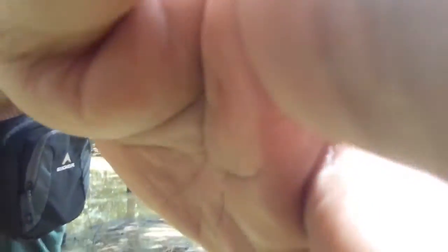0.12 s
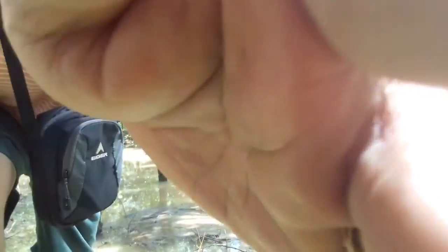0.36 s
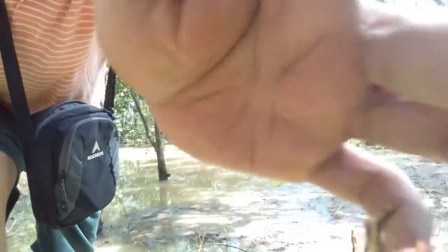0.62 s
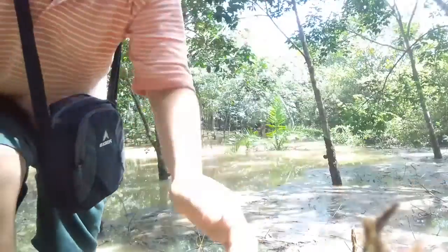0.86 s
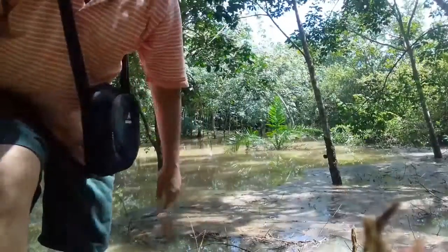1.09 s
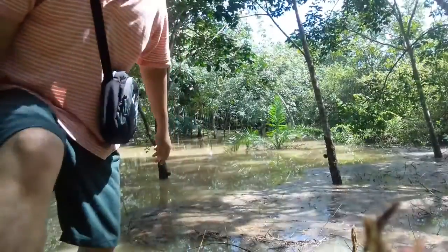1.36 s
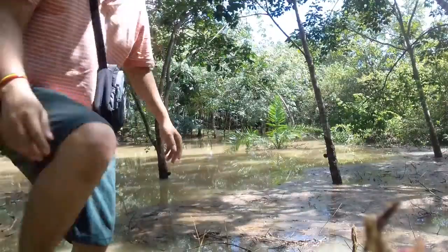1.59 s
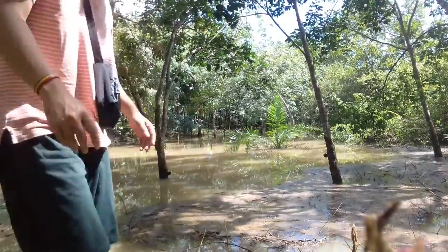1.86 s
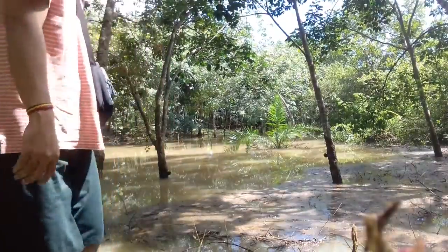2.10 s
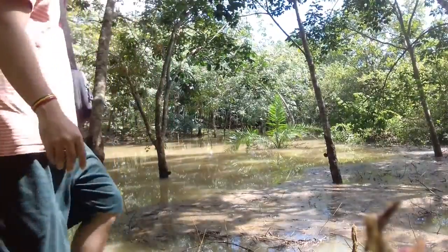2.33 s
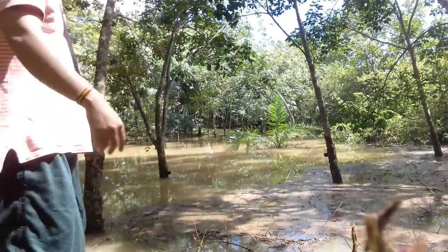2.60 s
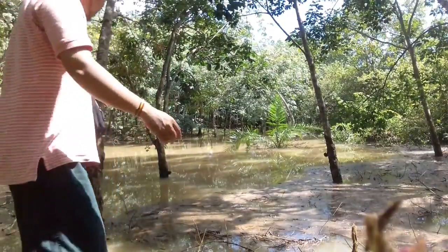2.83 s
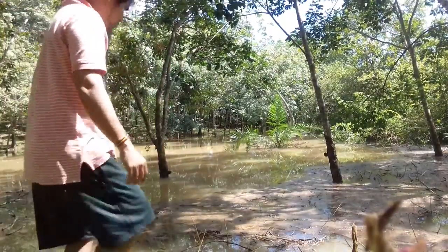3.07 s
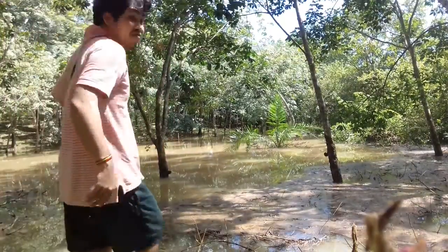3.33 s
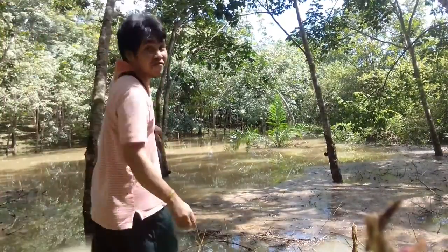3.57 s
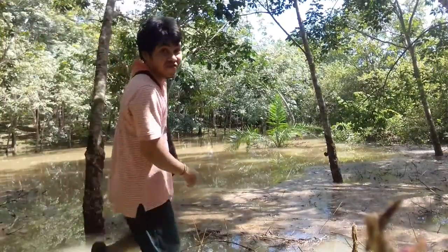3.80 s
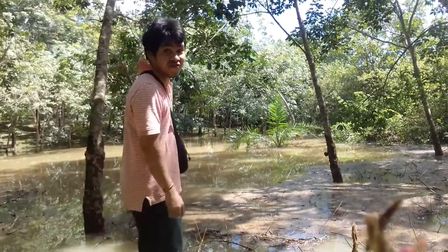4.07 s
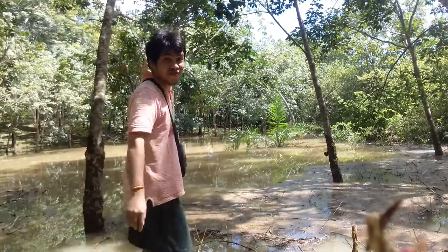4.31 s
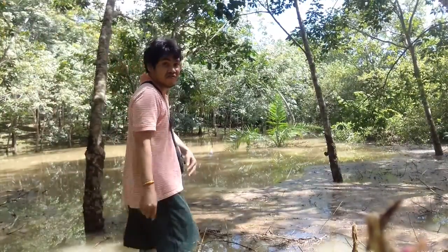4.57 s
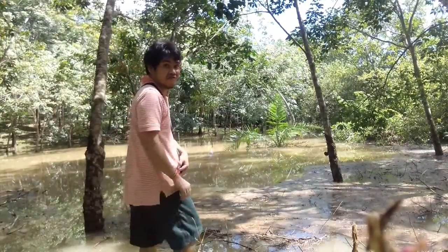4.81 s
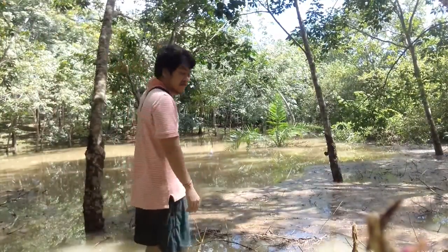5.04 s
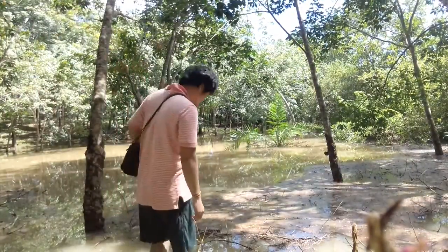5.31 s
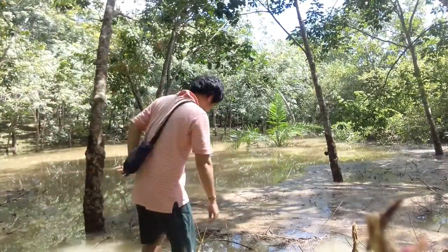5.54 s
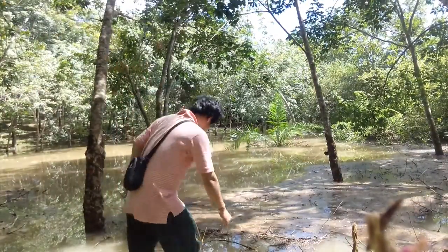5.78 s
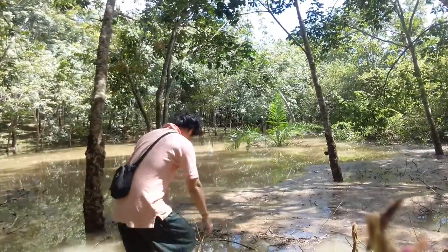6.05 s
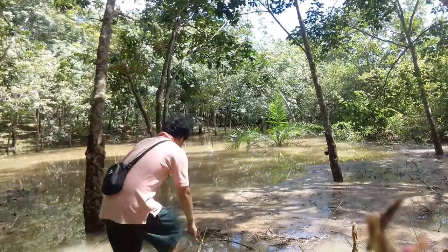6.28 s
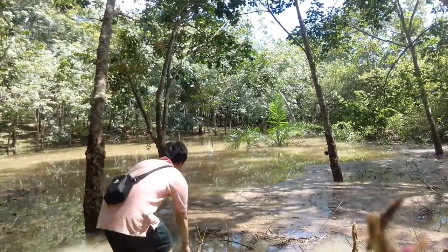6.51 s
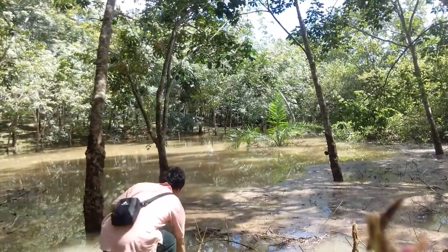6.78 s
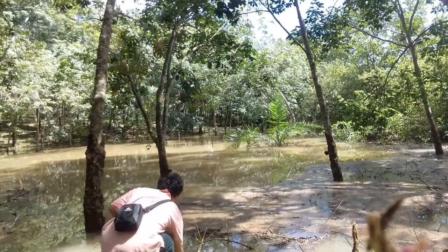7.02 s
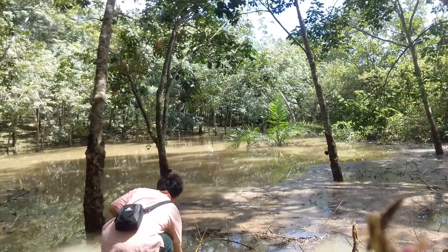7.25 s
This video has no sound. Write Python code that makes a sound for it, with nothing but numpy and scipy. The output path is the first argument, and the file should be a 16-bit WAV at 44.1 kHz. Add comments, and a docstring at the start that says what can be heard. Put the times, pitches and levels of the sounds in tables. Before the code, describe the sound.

Someone wades through wet litter with cracks and small mud plops while a near bird repeats chip-and-rising-whistle calls over shimmering insects.

```python
"""Wading through a flooded forest

A tropical forest under water: distant rumble, airy noise and the wash of wading lie below a chorus band
of dense clicks, far insects with some wading rustle and its echo. One near insect buzzes in bursts of
ringing clicks; birds whistle as gliding sines, and one voice croaks. Loud knocks open the scene, then
feet wade: wet litter crackles as filtered noise, twigs snap as struck modes and mud plops as sinking
tones. Scattered echoes surround the birds and the feet."""
import sys
import numpy as np
from scipy import signal
from scipy.fft import rfft, irfft
from scipy.io import wavfile
from scipy.ndimage import uniform_filter1d

SR = 44100
rng = np.random.default_rng(int(sys.argv[2]) if len(sys.argv) > 2 else 0)


def field_ratio(decibels):
    """Amplitude ratio for a level in dB (20 dB per decade); scalars and array-likes work."""
    return 10 ** (np.asarray(decibels, dtype=float) / 20)


def persist_wave(psi):
    """Save psi, clipped to +-1, as 16-bit WAV."""
    counts = np.round(np.clip(psi, -1, 1) * 32767).astype(np.int16)
    wavfile.write(sys.argv[1], SR, np.atleast_2d(counts).T)


N = 325899

# Slow swell of the background, before faster chance wavering:
# (time [s], rumble level [dB], level of the low chorus band, with wading rustle and its echo [dB],
# level of the high chorus band [dB], level of the airy noise and wading wash [dB])
SWELL = [(0.0, -53.5, -52, -58.5, -63.5), (0.3, -52.5, -56.5, -54, -64), (0.93, -58, -61.5, -61, -65),
         (1.48, -53, -57, -59.5, -65), (2.04, -54.5, -60.5, -59.5, -65), (2.24, -55.5, -58, -59.5, -60.5),
         (2.6, -53, -60.5, -58, -62), (3.0, -54.5, -62, -58, -62), (3.43, -56, -60.5, -59.5, -60.5),
         (3.7, -55, -56, -59, -58.5), (4.09, -56, -58.5, -60, -62.5), (4.82, -58, -63, -60, -65),
         (5.37, -57, -55, -60, -62.5), (5.7, -55, -59, -59, -58.5), (6.0, -57, -57.5, -59.5, -64),
         (6.98, -55.5, -58.5, -59.5, -63), (7.39, -56, -59.5, -59.5, -66.5)]


def evened(x):
    """Normalises the mean power: scales to rms 1."""
    return x / np.sqrt(np.mean(x ** 2) + 1e-20)


def read(points, hz):
    """Interpolates a spectrum on a logarithmic frequency axis."""
    f, value = np.transpose(points)
    return np.interp(np.log(hz + 1), np.log(f + 1), value)


def along(rows, column):
    """Interpolates one column of a time curve linearly at every sample."""
    rows = np.array(rows)
    return np.interp(np.arange(N) / SR, rows[:, 0], rows[:, column])


def add(mix, s, sound):
    """Superposition: mixes a sound in from time s."""
    part = mix[round(s * SR):][:len(sound)]
    part += sound[:len(part)]


def colour(x, points):
    """Linear filtering: weights the spectrum of x by a curve in dB."""
    gain = field_ratio(read(points, np.fft.rfftfreq(len(x), 1 / SR)))
    return irfft(rfft(x) * gain, len(x))


def split(x, hz):
    """Complementary filtering: the parts below and above hz add up to x."""
    low = signal.sosfiltfilt(signal.butter(4, hz, fs=SR, output="sos"), x)
    return low, x - low


def ring(x, hz, width):
    """Damped resonance: every click rings one mode, whose envelope starts at the click's height."""
    r, w = np.exp(-np.pi * width / SR), 2 * np.pi * hz / SR
    return signal.lfilter([0, np.sin(w)], [1, -2 * r * np.cos(w), r * r], x)


def steep(x, hz, width):
    """Two equal resonances in series give a softer start and darker flanks than one."""
    twice = ring(ring(x, hz, width), hz, width)
    return twice * 2 * (1 - np.exp(-np.pi * width / SR))


def clicks(per_s, spread_db):
    """Random impulse process: clicks of either sign at chance times, a few of them large."""
    draw = rng.random((N, 3))
    size = field_ratio(-spread_db * np.log(np.maximum(draw[:, 0], .004)))
    return size * (draw[:, 1] < per_s / SR) * np.sign(draw[:, 2] - .5)


def wobble(per_s):
    """Slow random modulation of rms 1: straight lines between chance knots, per_s of them a second."""
    knots = rng.standard_normal(int(N / SR * 60) + 2)
    return evened(np.interp(np.arange(N) / SR * per_s, np.arange(len(knots)), knots))


def tone(hz, db, edge, overtone_db):
    """Phase integration: a gliding sine with a weak octave and soft ends; db is the sine's rms level."""
    turn = 2 * np.pi * np.cumsum(hz) / SR
    wave = np.sin(turn) + field_ratio(overtone_db) * np.sin(2 * turn)
    return np.sqrt(2) * field_ratio(db) * wave * signal.windows.tukey(len(hz), np.clip(edge, 0, 1))


def note(rows):
    """Interpolates a note's contour: its start time and each column at every sample."""
    s, *columns = np.transpose(rows)
    t = np.arange(s[0], s[-1], 1 / SR)
    return s[0], [np.interp(t, s, c) for c in columns]


def forest(x):
    """Multiple scattering: trunks return sparse taps, each band decaying at its own speed."""
    # Decay of the echoes: (frequency [Hz], time to fall by 60 dB [s])
    decay = [(300, 0.093), (2000, 0.68), (4500, 0.83), (12000, 0.39)]
    taps = np.zeros(SR)
    at = np.arange(500, SR - 20, 20)
    taps[at + rng.integers(0, 20, len(at))] = rng.choice([-1., 1.], len(at))
    hz, t, z = signal.stft(taps, SR, nperseg=256)
    t60 = np.maximum(read(decay, hz), .02)[:, None]
    tail = signal.istft(z * field_ratio(-60 * t / t60), SR, nperseg=256)[1]
    return signal.fftconvolve(x, tail / np.linalg.norm(tail))[:N]


def distant_rumble():
    """Amplitude-modulated low noise: a distant rumble that heaves."""
    # Relative spectrum of the rumble: (frequency [Hz], density [dB per Hz])
    rumble_spectrum = [(15, -58), (25, -36), (32, -37), (54, -23), (67, -13), (78, -9.5), (87, -3.5),
                       (102, 4.5), (119, -2.5), (150, 0.5), (197, -6.5), (233, -5.5), (271, -5.5),
                       (302, -13), (420, -20), (550, -26), (920, -120)]
    level_db = along(SWELL, 1) + 0.86 * wobble(9)
    return field_ratio(level_db) * evened(colour(rng.standard_normal(N), rumble_spectrum))


def airy_noise_and_wash():
    """Amplitude-modulated broad noise: airy forest noise and the wash of wading."""
    # Relative spectrum of the airy noise and wash: (frequency [Hz], density [dB per Hz])
    airy_spectrum = [(180, -55), (300, -5), (526, -2.5), (654, -5.5), (726, -4.5), (1720, -5.5),
                     (2890, -12), (3600, -19), (4680, -45), (7920, -120)]
    level_db = along(SWELL, 4) + 1.46 * wobble(6.6)
    return field_ratio(level_db) * evened(colour(rng.standard_normal(N), airy_spectrum))


def hums():
    """Frequency and amplitude modulation: faint low tones waver in pitch and level."""
    # Hums before wavering: (frequency [Hz], level [dB], start [s], end [s])
    hum_rows = [(142.8, -67, 0.0046, 9.8), (650, -74.5, 0.08, .52)]
    out = np.zeros(N)
    for hz, db, start, end in hum_rows:
        count = round((end - start) * SR)
        pitch_waver, level_waver = wobble(7)[:count], wobble(28)[:count]
        wavering_hz = hz * (1 + .012 * pitch_waver)
        add(out, start, tone(wavering_hz, db + 3.4 * level_waver, edge=.1, overtone_db=-40))
    return out


def chorus():
    """Dense superposition: clicks merge in two bands, far insects and, in the low one, wading rustle."""
    # Relative spectrum of the chorus: (frequency [Hz], density [dB per Hz])
    chorus_spectrum = [(1940, -26.5), (3300, -18.5), (3810, -10), (4220, -8.5), (4320, -1.5), (4490, -4.5),
                       (4600, 4), (5110, -6), (5680, -7), (6100, -18), (6700, -4), (7130, 0), (7500, -3),
                       (8020, -28.5), (8400, -25.5), (10900, -37), (18500, -120)]
    low, high = split(colour(clicks(9000, spread_db=1.5), chorus_spectrum), 6200)
    low_db = along(SWELL, 2) + 1.8 * wobble(16)  # also swells with the rustle and its echo
    high_db = along(SWELL, 3) + 0.26 * wobble(11)
    return evened(low) * field_ratio(low_db) + evened(high) * field_ratio(high_db)


def singer():
    """Quadrature modulation: noise shifted up to an insect's pitch swells slowly and drops away."""
    # Swells of the narrow band: (time of the peak [s], time of the rise [s], frequency [Hz], peak level [dB])
    swells = [(0.402, 0.32, 4600, -55), (1.498, 0.34, 4400, -55.5), (2.898, 0.17, 4520, -50),
              (4.24, 0.094, 4490, -57)]
    rise_db, fall_db_per_s, rest_db = 6, 200, -71.5  # rise_db is gained in each time of the rise
    a, b = signal.sosfilt(signal.butter(2, 130, fs=SR, output="sos"), rng.standard_normal((2, N)))
    t = np.arange(N) / SR
    s, rise, hz, db = np.transpose(swells)[:, :, None]
    level_db = db - np.maximum(rise_db * (s - t) / rise, fall_db_per_s * (t - s))
    turn = 2 * np.pi * np.cumsum(np.interp(t, s[:, 0], hz[:, 0])) / SR
    fuzzy_whistle = evened(a * np.cos(turn) + b * np.sin(turn))
    return field_ratio(np.maximum(level_db.max(0), rest_db)) * fuzzy_whistle


def far_birds():
    """Random modulation in propagation: a long whistle and slurs flutter on their way through the trees."""
    # Long whistle before its flutter: (time [s], frequency [Hz], level [dB])
    far_whistle = [(5.77, 1915, -63.5), (6.05, 1893, -58.5), (6.1, 1990, -65.5), (6.25, 2185, -68),
                   (6.45, 2090, -67), (6.62, 2020, -70), (6.7, 2032, -61), (6.95, 2115, -64.5),
                   (7.17, 2221, -59.5), (7.39, 2200, -66)]
    # Falling slurs of a small bird, before the flutter:
    # (time [s], length [s], first frequency [Hz], last frequency [Hz], level [dB])
    slurs = [(5.70, .055, 5200, 3900, -61), (6.125, .065, 5700, 4000, -59), (7.055, .075, 5800, 3700, -57)]
    out = np.zeros(N)
    s, (hz, db) = note(far_whistle)
    flutter_db = 4 * wobble(58)
    trembling_hz = hz * (1 + 0.0118 * wobble(40)[:len(hz)])
    add(out, s, tone(trembling_hz, db + flutter_db[:len(hz)], edge=0.017, overtone_db=-41))
    for s, length, first_hz, last_hz, db in slurs:
        count = round(length * SR)
        falling_hz = np.geomspace(first_hz, last_hz, count)
        add(out, s, tone(falling_hz, db + flutter_db[:count], edge=.5, overtone_db=-40))
    return out


def croak():
    """Source and filter: regular pulses excite two resonances and die away."""
    # The croak: (time [s], length [s], pulse rate [Hz], level before the fade [dB])
    s, length, hz, db = (3.762, .11, 248, -49)
    # Resonances of the body: (frequency [Hz], width [Hz], relative gain [dB])
    body_modes = [(560, 180, 6), (1320, 170, 1.5)]
    fade_db = 22
    out = np.zeros(N)
    u = np.linspace(0, 1, round(length * SR))
    pulses = np.diff(np.floor(u * length * hz), prepend=0)
    body = sum(field_ratio(gain_db) * ring(pulses, f, width) for f, width, gain_db in body_modes)
    add(out, s, field_ratio(db - fade_db * u ** 2) * evened(body) * signal.windows.tukey(len(u), .3))
    return out


def near_insect():
    """Impulsive excitation of resonances: short runs of regular clicks ring the tymbal's modes."""
    # Bursts: (time of the first click [s], level before the modes' gains [dB])
    bursts = [(0.033, -61), (0.165, -62), (0.267, -66), (0.355, -66), (0.3802, -58.5), (0.4853, -57),
              (0.548, -62), (0.652, -64), (0.7043, -63), (0.7786, -64), (0.8843, -59), (0.946, -62.5),
              (1.0053, -61), (1.2054, -63), (1.4245, -61), (1.65, -59), (1.693, -60), (1.724, -61.5),
              (1.7846, -60), (1.822, -60.5), (1.8914, -58), (1.95, -58.5), (2.025, -60), (2.09, -58)]
    # Modes of the tymbal: (frequency [Hz], width [Hz], gain [dB])
    tymbal = [(4550, 810, 21), (5750, 420, 12), (9860, 1300, 3.5)]
    burst_clicks, clicks_per_s = 5, 216.6
    drive, at = np.zeros(N), np.arange(burst_clicks) / clicks_per_s
    for (s, db), wander in zip(bursts, rng.standard_normal((len(bursts), burst_clicks))):
        drive[np.round((s + at) * SR).astype(int)] += field_ratio(db + 1.1 * wander)
    # two ribs buckle in turn, 9 samples apart
    drive = np.convolve(drive, [.6, 0, 0, 0, 0, 0, 0, 0, 0, .8], "same")
    return sum(field_ratio(db) * steep(drive, hz, width) for hz, width, db in tymbal)


def near_bird():
    """Frequency glides: a falling chip swoops down, then a whistle climbs steadily, swells and stops."""
    # Rising whistles: (time of the peak [s], frequency at the peak [Hz], peak level [dB],
    # time of the rise [s], climb [Hz per s])
    whistles = [(2.480, 1835, -41.5, 0.056, 8050), (2.855, 1750, -38, 0.075, 3770),
                (3.137, 1870, -37.5, 0.063, 9500), (3.482, 1728, -40, 0.077, 3020),
                (3.763, 1830, -36.5, 0.053, 9920), (6.386, 1770, -40.5, 0.064, 6880),
                (6.749, 1803, -38.5, 0.099, 4190), (7.086, 1794, -37.5, 0.082, 4600),
                (7.43, 1743, -48, 0.12, 4400)]
    # Falling chips: (time near the peak [s], peak level [dB], middle frequency [Hz],
    # swoop level relative to the chip [dB])
    chips = [(2.376, -42.5, 3350, -12), (2.7217, -36.5, 3290, -25), (3.046, -34.5, 3250, -17.5),
             (3.3644, -36.5, 3180, -28), (3.6845, -37, 3230, -30), (6.289, -37.5, 3180, -20),
             (6.6154, -37, 3000, -16.5), (6.966, -38, 3090, -22), (7.3242, -37, 3000, -17)]
    rise_db, fall_db, fall_s = 19.5, 17.5, 0.035
    low_hz, knee_hz = 1473, 50  # the climb leaves the low pitch softly
    swell_share = .8  # the last share of the rise swells
    swoop_s, sink_s = .024, .004  # the swoop levels out near the low pitch
    out, u = np.zeros(N), np.linspace(0, 1, 440)
    for s, hz, db, rise, climb in whistles:
        t = np.arange(-rise, fall_s, 1 / SR)
        before_db = rise_db * (-t / rise / swell_share).clip(0, 1) ** 1.33
        after_db = fall_db * (t / fall_s) ** 2
        loss_db = np.where(t < 0, before_db, after_db)
        climbing_hz = knee_hz * np.logaddexp((hz + climb * t) / knee_hz, low_hz / knee_hz)
        add(out, s - rise, tone(climbing_hz, db - loss_db, edge=0.067, overtone_db=-30))
    glide = 1.14 - .28 * u
    arch_db = -130 * (u - .5) ** 2  # loudest halfway down
    sink = np.exp(-np.arange(0, swoop_s, 1 / SR) / sink_s)
    for s, db, hz, swoop_db in chips:
        chip = tone(hz * glide, db + arch_db, edge=0.29, overtone_db=-40) / np.sqrt(2)
        swoop = tone(low_hz + 0.424 * hz * sink, db + swoop_db, edge=0.13, overtone_db=-40)
        add(out, s - .004, chip)
        add(out, s + 0.0071, swoop)
    return out


def plops():
    """Release of trapped air: mud underfoot lets it go with a short, sputtering tone that sinks."""
    # Plops before sputtering: (time [s], length [s], first frequency [Hz], last frequency [Hz], level [dB])
    plop_rows = [(2.328, .01, 1100, 930, -40.5), (2.889, 0.025, 1230, 980, -33.5),
                 (2.914, 0.0063, 1050, 900, -33.5), (3.726, 0.013, 960, 850, -42.5),
                 (6.583, 0.0147, 1065, 890, -46), (7.046, 0.019, 1020, 950, -53.5)]
    out = np.zeros(N)
    sputter_db = 3.5 * uniform_filter1d(rng.standard_normal(N), 60) * np.sqrt(60)
    for s, length, first_hz, last_hz, db in plop_rows:
        sinking_hz = np.geomspace(first_hz, last_hz, round(length * SR))
        add(out, s, tone(sinking_hz, db, edge=1.0, overtone_db=-13.5))
    return out * field_ratio(sputter_db)


def rustle():
    """Crackle noise: clumped grains over a wet wash; the drier the litter, the stronger the upper bands."""
    # Crunches of wading, before the band offsets:
    # (time [s], nominal length [s], body level [dB], brightness: treble over body [dB])
    crunches = [(0.063, 0.023, -75.5, 28.5), (0.653, 0.05, -67.5, -4), (1.406, 0.12, -66.5, -3),
                (1.503, 0.13, -59, 9.5), (2.004, 0.11, -60.5, -3), (2.038, 0.2, -57, -2),
                (2.34, 0.1, -56.5, -5), (2.437, 0.02, -52.5, -2.5), (2.773, 0.12, -58.5, -5),
                (2.892, 0.04, -44.5, -15.5), (3.003, 0.082, -57, -2), (3.097, 0.04, -54.5, 5),
                (3.337, 0.04, -51, -5), (3.492, 0.017, -35, -15), (3.52, 0.05, -73, 17),
                (3.645, 0.057, -51, -4.5), (3.703, 0.093, -57.5, 3), (4.396, 0.11, -55.5, -14),
                (4.53, 0.026, -59.5, -32), (5.053, 0.046, -49.5, -8), (5.1, 0.15, -53, -10.5),
                (5.254, 0.012, -56, -14), (5.341, 0.011, -55, 0), (5.367, 0.046, -69, 16.5),
                (5.422, 0.03, -60.5, -4), (5.54, 0.19, -59.5, -15), (5.984, 0.12, -57, -18),
                (6.167, 0.036, -58, -11), (6.259, 0.065, -58, -3), (6.375, 0.029, -55.5, -3),
                (6.512, 0.052, -56, -12), (6.557, 0.049, -49, -4), (7.309, 0.072, -71, 10)]
    # Relative spectrum of the grains: (frequency [Hz], gain [dB])
    grain_spectrum = [(400, -9), (1000, 2.8), (1500, 3), (2300, -1.5), (3200, -18.5), (4600, -18.5),
                      (6500, -30.5), (12000, -35)]
    # Body, middle, treble and top bands: (share of the brightness [1], offset [dB])
    bands = [(0, 1.5), (.6, -4), (1, 2), (1, -21.5)]
    clump_db = 2.5  # each band clumps on its own
    crackle = evened(clicks(1500, spread_db=2.5)) * field_ratio(1.2 * wobble(60))
    wash = .3 * rng.standard_normal(N)
    body, rest = split(colour(crackle + wash, grain_spectrum), 1880)
    middle, rest = split(rest, 3050)
    treble, top = split(rest, 7060)
    strength = np.zeros((4, N))
    for s, length, db, bright_db in crunches:
        swell = signal.windows.tukey(round((length + 0.032) * SR), .7)
        for band, (share, band_db) in zip(strength, bands):
            add(band, s - .01, field_ratio(db + share * bright_db + band_db) * swell)
    parts = zip(strength, (body, middle, treble, top))
    return sum(gain * evened(part * field_ratio(clump_db * wobble(55))) for gain, part in parts)


def snaps():
    """Modal excitation: a crack and its splinters ring most the modes favoured by the twig's size."""
    # Snaps and knocks: (time near the peak [s], peak level before the high-pass [dB],
    # frequency set by the twig's size [Hz], fall below it [dB per octave], fall above it [dB per octave])
    snap_rows = [(0.068, -12, 5270, 28, 12), (0.0814, -27, 4700, 27, 22), (.226, -30.5, 4550, 26, -4.5),
                 (1.5429, -29.5, 3970, 12, 42), (1.5667, -23.5, 3600, 32, 26), (1.602, -32, 4050, 8, 24),
                 (1.622, -31, 3300, 32, 17), (2.141, -38, 2050, 19, 14), (2.1968, -37, 1930, 18, 13),
                 (2.2447, -27.5, 1340, 12, 38), (2.2802, -24.5, 1450, 24, 10.5),
                 (2.3296, -32, 1340, 16, 22), (2.446, -27, 2150, 34, 24), (2.8488, -25, 1290, 1, 7),
                 (2.8997, -25, 1080, 4, 15), (2.9101, -23.5, 1000, 3, 13), (2.931, -34, 1000, 14, 24),
                 (3.1254, -28, 1720, 35, 16), (3.349, -21, 1100, -10, 19.5), (3.3724, -32, 1400, 7, 8),
                 (3.497, -19.5, 1700, 10, 16), (3.5003, -11, 4600, -2, 1.5), (3.504, -17, 1100, 21, 23),
                 (3.509, -34, 9000, 6, -2), (3.515, -50, 1300, 8, 16), (3.6608, -32, 1770, 5, 2.5),
                 (3.7302, -33, 1390, 10, 22), (4.1534, -46, 1500, -12, 7), (4.4694, -35, 1510, 31, 20),
                 (4.776, -40.5, 1270, 16, 22), (5.0841, -28.5, 1400, 2, 23), (5.0927, -31.5, 740, -1, 28),
                 (5.14, -30.5, 1900, 12, 5), (5.2144, -36.5, 4600, 10, 5), (5.195, -39, 1500, 14, 7.9),
                 (5.234, -37, 1290, 10, 12), (5.269, -44, 1320, 20, 33), (5.3362, -10, 1770, 49, 9),
                 (5.3975, -28, 1840, 33, 10), (5.819, -35, 600, -21, 10), (6.0296, -37.5, 1900, 18, 14),
                 (6.389, -34.5, 1830, 20, 7), (6.5883, -28, 1370, 5, 35), (6.5975, -29.5, 4600, 10, 20)]
    # Modes that a snap rings: (frequency [Hz], width [Hz], relative gain [dB])
    snap_modes = [(600, 920, -10.5), (1100, 380, -2), (1770, 500, 10), (2090, 420, 2.5), (3530, 360, -4),
                  (4600, 970, 17), (6080, 700, 5.5), (9700, 2000, 3.5), (14000, 2000, 6)]
    out, t = np.zeros(N), np.arange(900) / SR
    chance = rng.standard_normal((len(snap_rows), 900))
    for (s, db, size_hz, below_db, above_db), splinters in zip(snap_rows, chance):
        scatter = 0.038 * splinters * field_ratio(-60 * t / 0.022)
        crack = scatter - np.exp(-t / .00006) / 3  # the break takes a moment
        octaves = np.log2([mode[0] / size_hz for mode in snap_modes])
        falls_db = np.maximum(-below_db * octaves, above_db * octaves)
        rung = sum(field_ratio(gain_db - fall) * steep(crack, hz, width)
                   for (hz, width, gain_db), fall in zip(snap_modes, falls_db))
        add(out, s - .0004, field_ratio(db) * rung / abs(rung).max())
    # the snaps carry no bass below about 380 Hz
    return signal.sosfilt(signal.butter(3, 380, "high", fs=SR, output="sos"), out)


def scene():
    """Superposition: all sources and their echoes reach both channels alike."""
    bird, far, feet = near_bird(), far_birds() + croak(), snaps() + plops()
    echoes = forest(field_ratio(-8.5) * bird + far + field_ratio(-25) * feet)
    background = distant_rumble() + airy_noise_and_wash() + hums() + chorus() + singer()
    mid = background + near_insect() + rustle() + bird + far + feet + echoes
    return np.array([mid, mid])


def roll_off(x):
    """The treble ends steeply here."""
    return signal.sosfilt(signal.butter(12, 16490, fs=SR, output="sos"), x)


def record(dry):
    """Additive self-noise: the microphone adds hiss, partly of opposite sign in the two channels."""
    # Relative spectrum of the common hiss: (frequency [Hz], density [dB per Hz])
    hiss_spectrum = [(4710, -31), (8000, -3), (8630, -23), (10000, -10), (12900, -9.5), (14700, -7.5),
                     (15300, -5.5), (16000, -35)]
    # Relative spectrum of the left-right difference: (frequency [Hz], density [dB per Hz])
    side_spectrum = [(15, -54), (25, -20), (114, -13), (200, -1.5), (531, -3), (624, -3), (840, -4),
                     (1790, -5.5), (2910, -7.5), (5430, -10), (7310, -15), (7920, -18), (16000, -13.5)]
    hiss_db, side_db = -73, -68  # rms
    hiss = field_ratio(hiss_db) * evened(colour(rng.standard_normal(N), hiss_spectrum))
    side = field_ratio(side_db) * evened(colour(rng.standard_normal(N), side_spectrum))
    mix = dry + hiss + np.array([side, -side])
    return roll_off(mix)


dry = scene()
out = record(dry)
persist_wave(out)
```